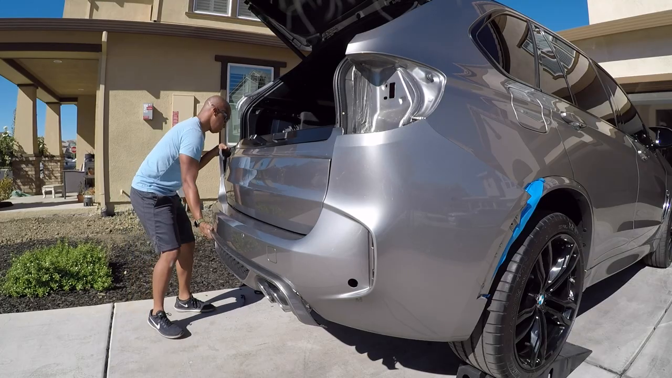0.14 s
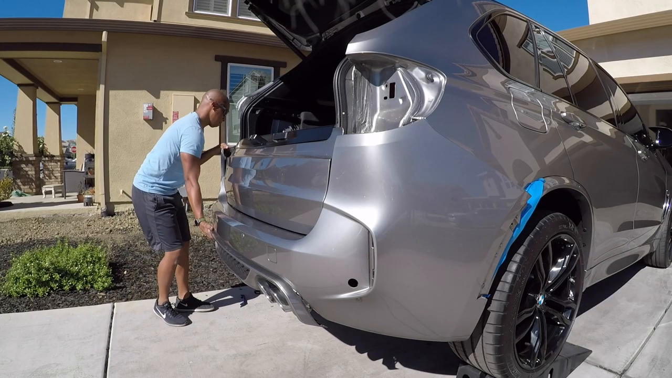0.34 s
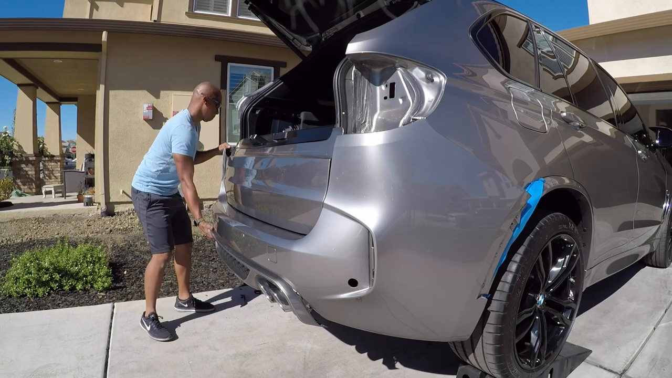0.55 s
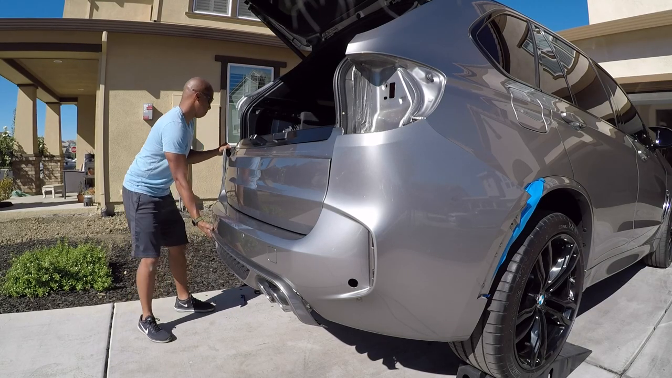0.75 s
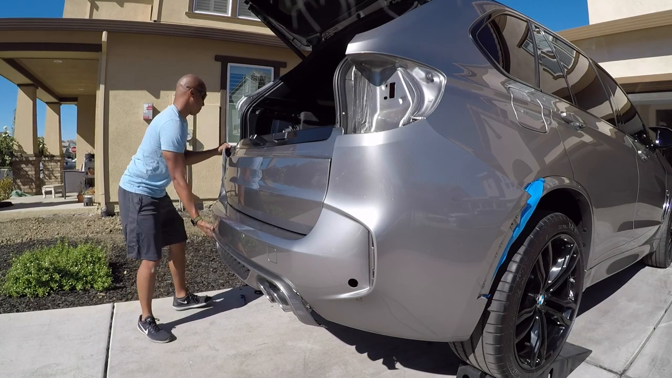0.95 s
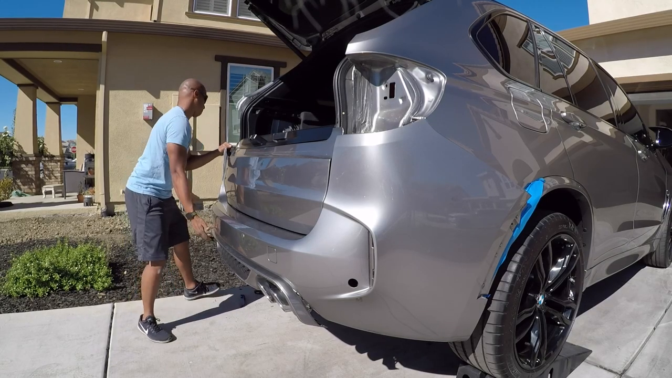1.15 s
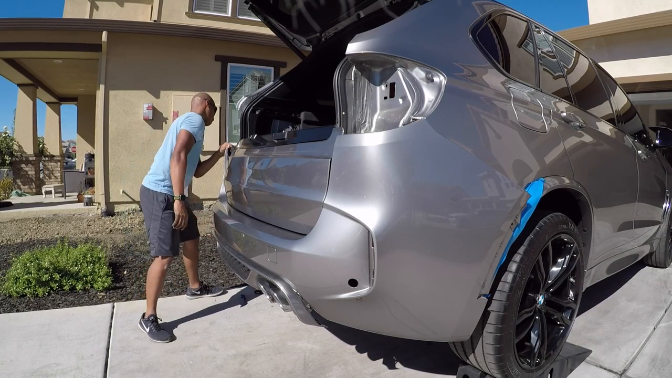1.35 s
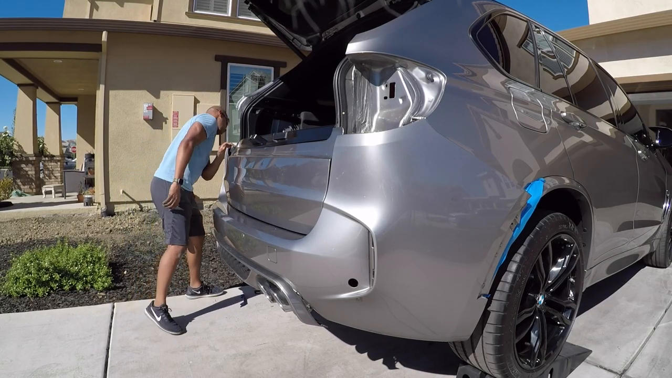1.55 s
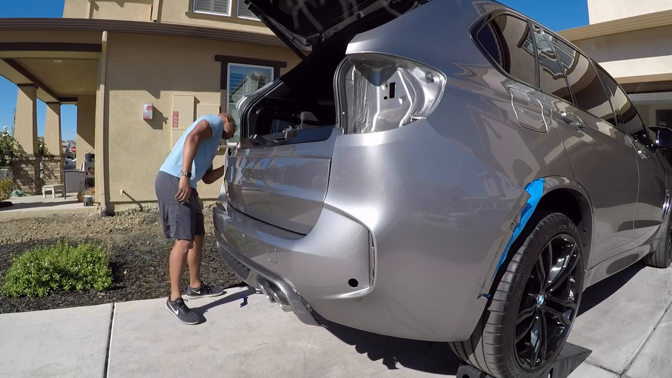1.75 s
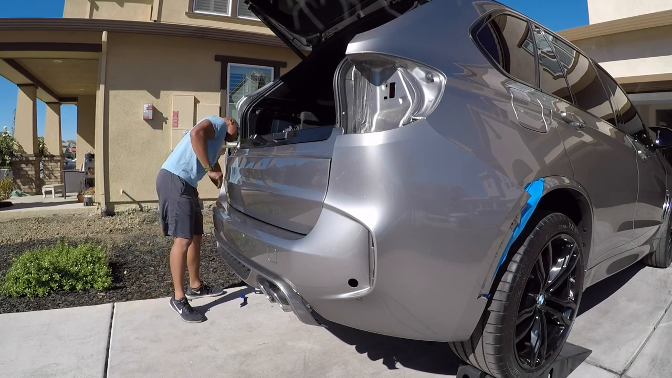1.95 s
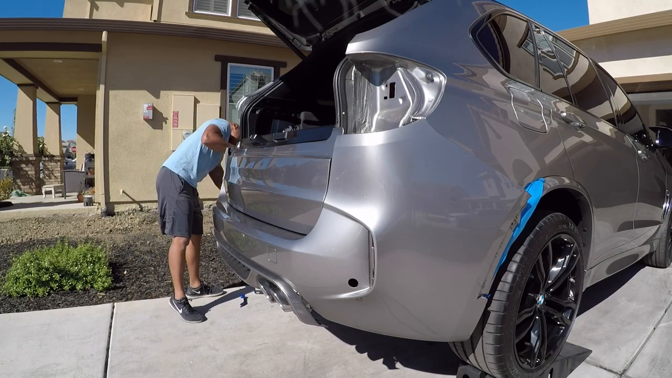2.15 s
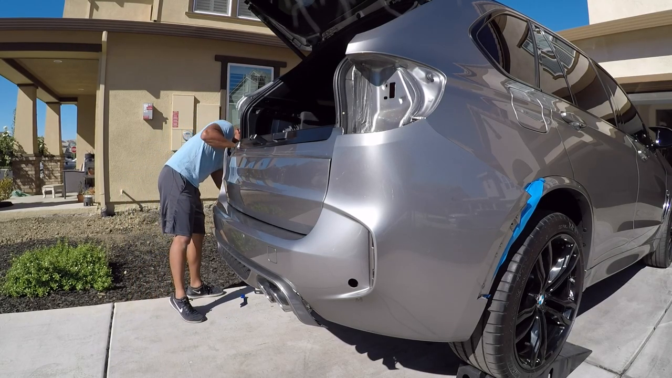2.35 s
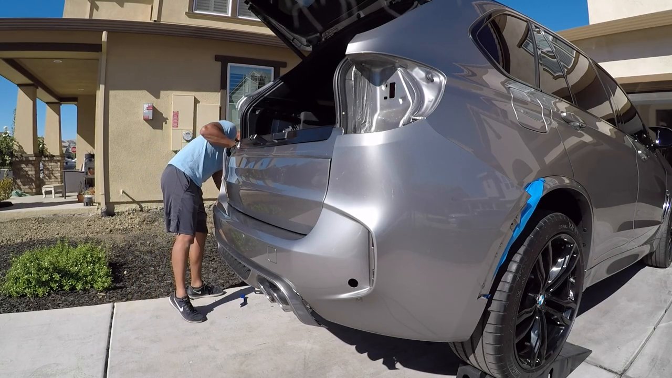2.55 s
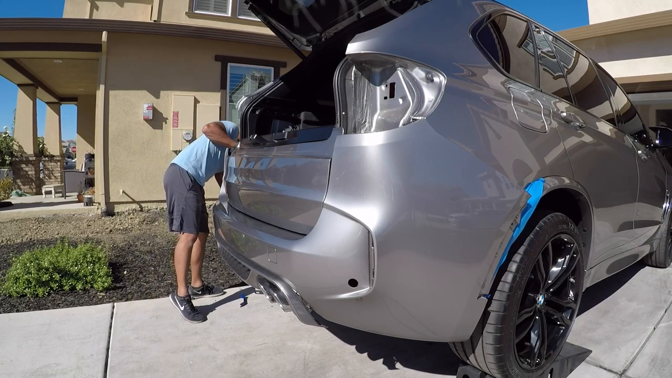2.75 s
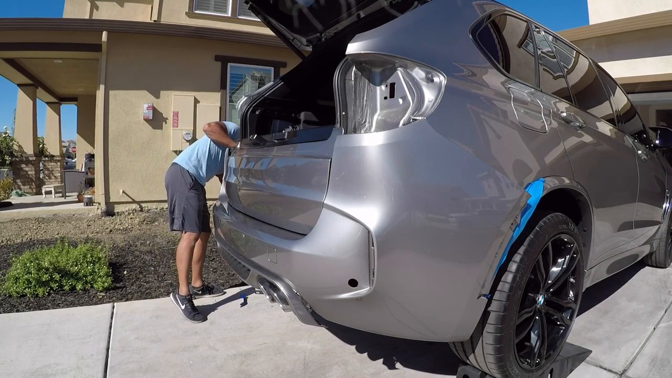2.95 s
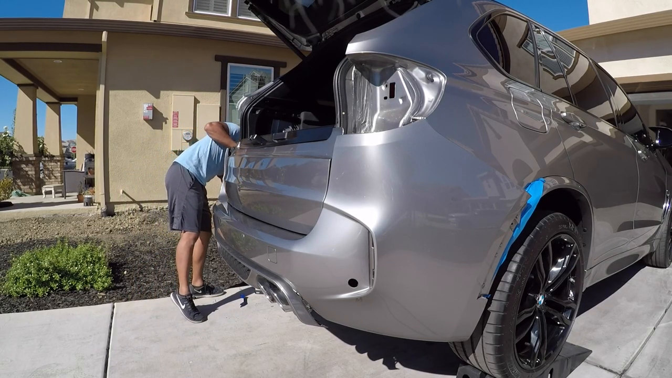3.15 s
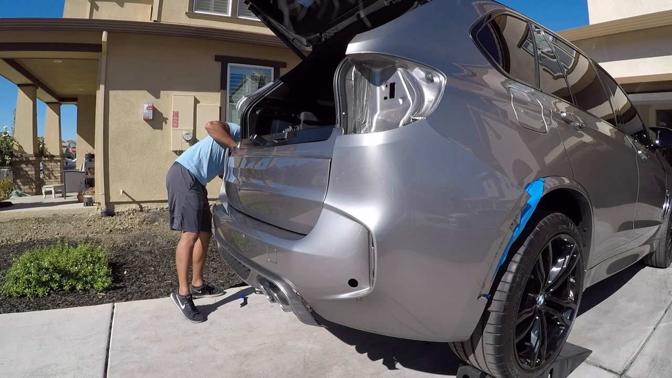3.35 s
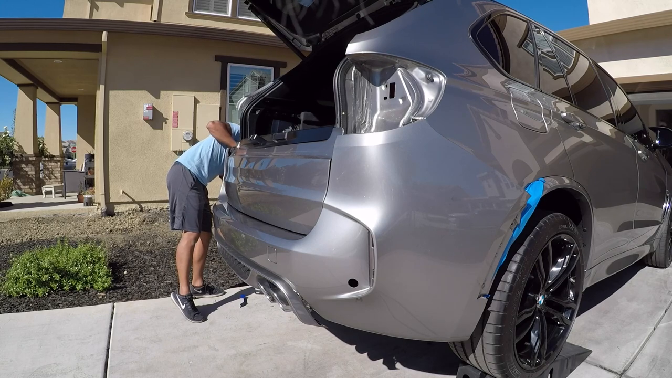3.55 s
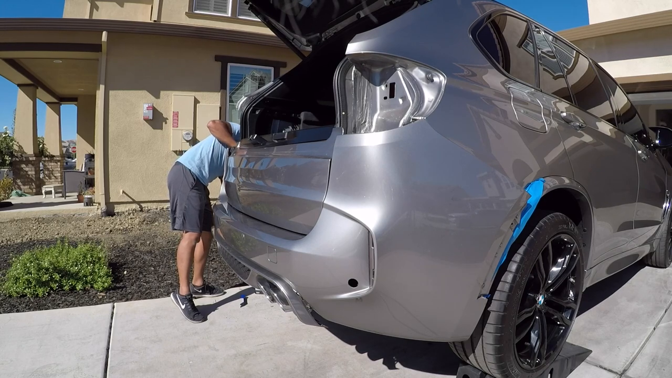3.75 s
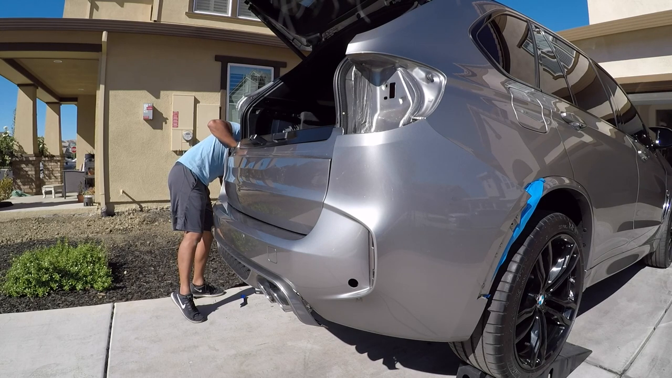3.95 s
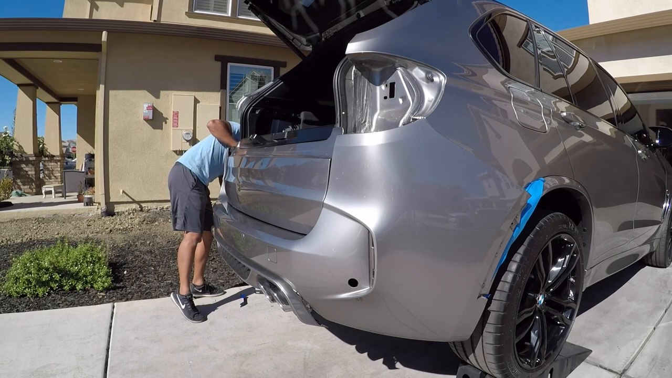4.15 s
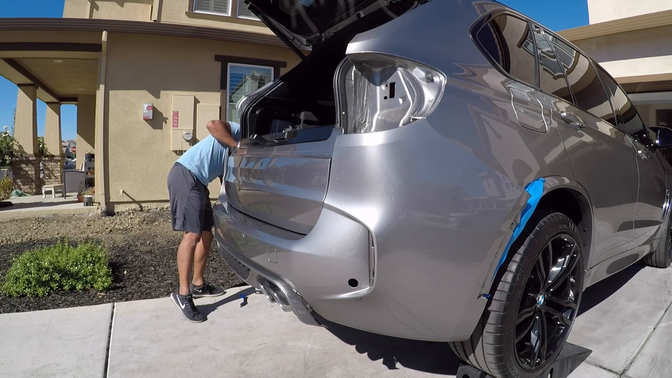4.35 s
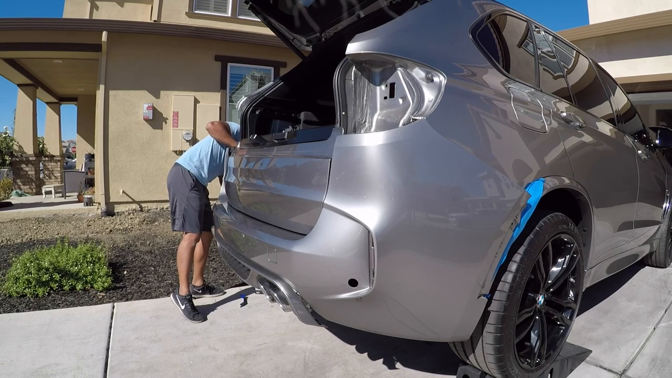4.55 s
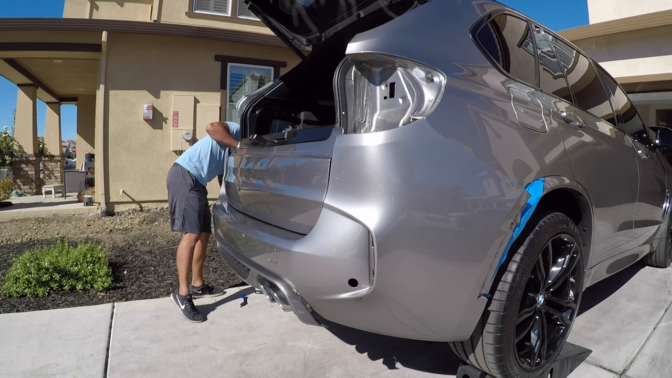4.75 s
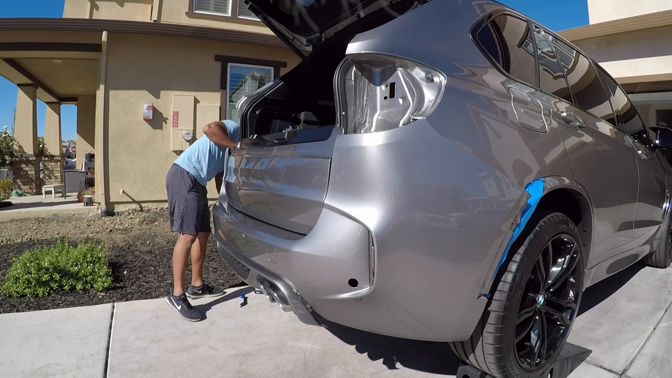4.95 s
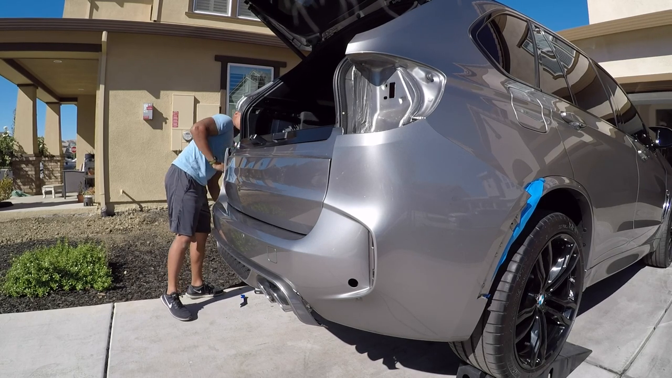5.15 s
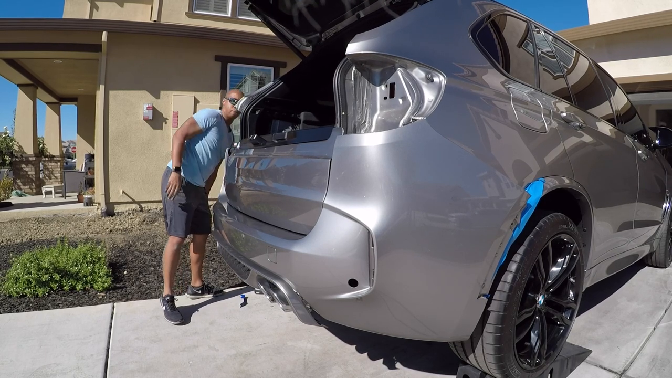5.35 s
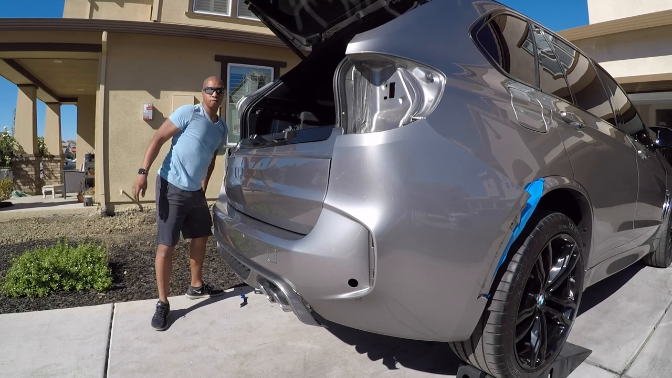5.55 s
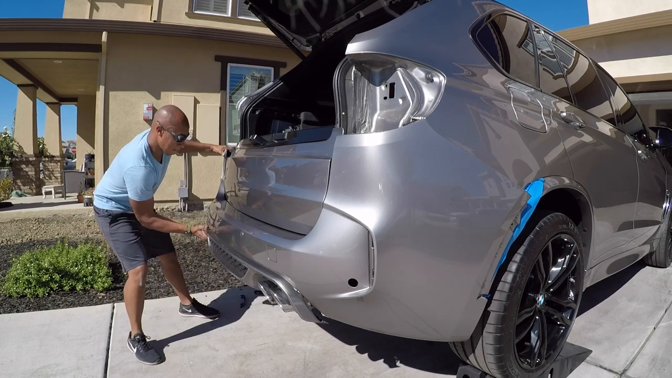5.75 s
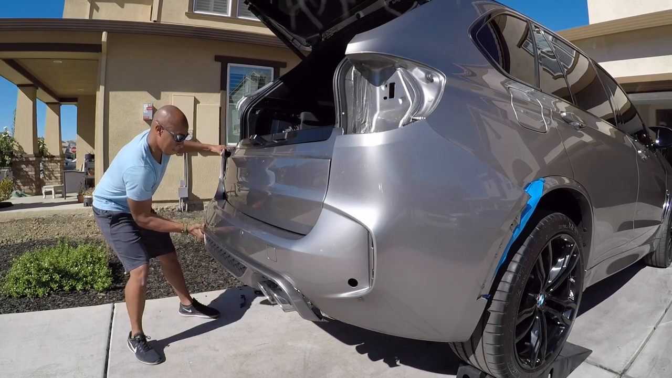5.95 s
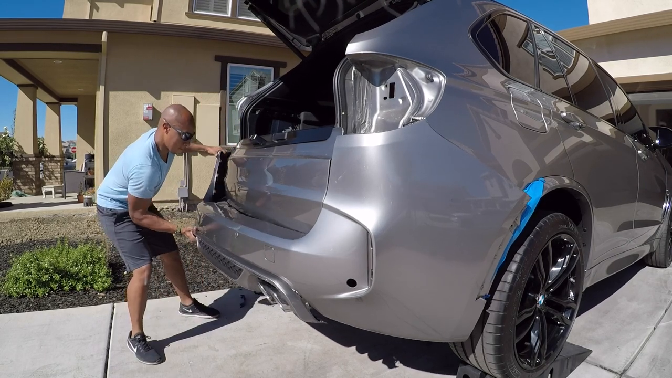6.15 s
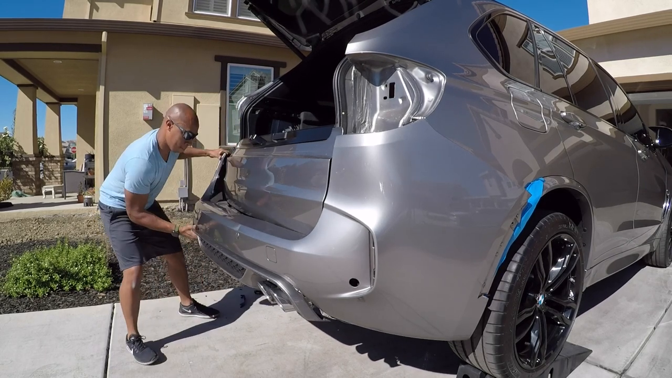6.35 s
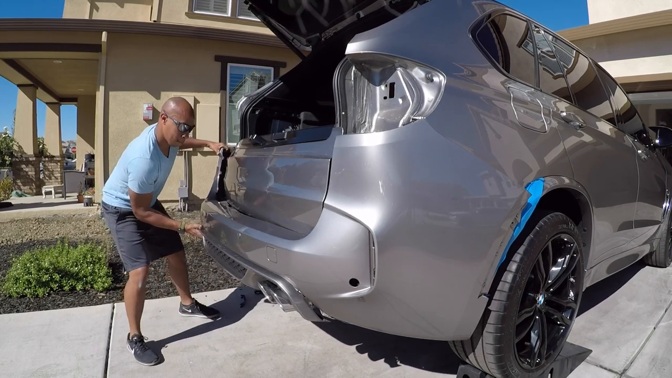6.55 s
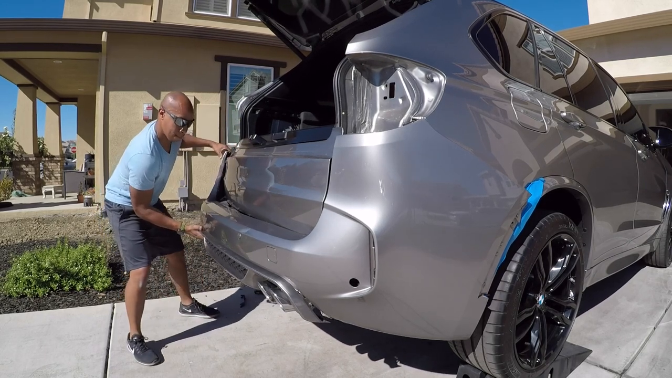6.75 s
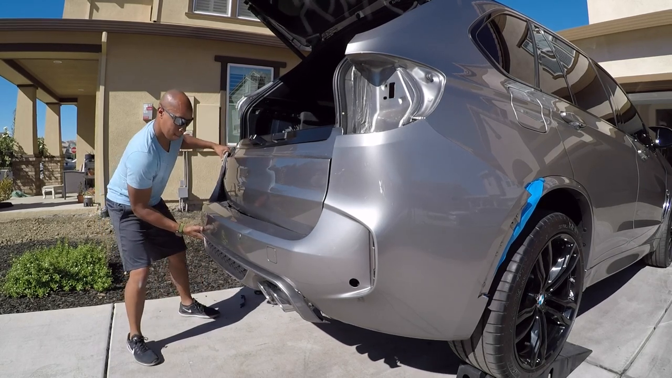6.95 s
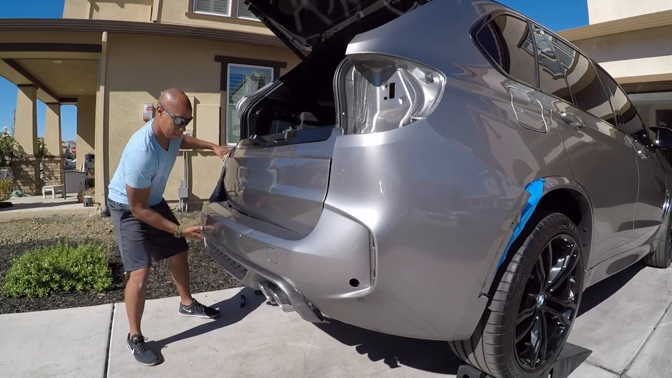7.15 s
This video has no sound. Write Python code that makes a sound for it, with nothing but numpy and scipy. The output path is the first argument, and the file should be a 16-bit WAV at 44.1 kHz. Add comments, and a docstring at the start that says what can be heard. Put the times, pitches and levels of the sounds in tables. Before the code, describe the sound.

A soft rush of distant traffic and leaves runs throughout, with a faint far hum and deep, gentle gusts on the microphone. In the first two seconds, shoes and hands scuff lightly and a car's plastic bumper cover gives a few quiet, hollow knocks. Small clip ticks and slightly firmer knocks come in clusters around 2.3 and 3.2 seconds. A faint plastic squeak follows at 3.5 seconds, then soft sliding and more light knocks near 4.6 seconds. From about 5.7 seconds the panel bends with dull thumps. Just after 6 seconds it tears free with a sharp double crack and a hollow thump, by far the loudest moment, echoing faintly off the houses. The loose shell then wobbles, with knocks and ticks that grow weaker until about 7.2 seconds.

```python
"""Pulling off a plastic bumper cover

A car's rear bumper cover is worked loose by hand on a driveway. Its clips tick, the shell knocks,
shoes scuff and an edge squeaks. The panel bends with dull thumps, then tears free with a double
crack and wobbles. Each tick, knock and crack is the ringing shell, filtered around its own pitch.
Houses throw the sound back, and a breeze buffets the microphone over a quiet neighbourhood."""
import sys
import numpy as np
from scipy import signal
from scipy.fft import rfft, irfft
from scipy.io import wavfile

SR = 44100
rng = np.random.default_rng(int(sys.argv[2]) if len(sys.argv) > 2 else 0)


def file_out(sig):
    """Save sig as 16-bit WAV at sys.argv[1]."""
    # one column per channel
    cols = np.atleast_2d(sig).T
    # limit, then scale
    lim = np.clip(cols, -1, 1)
    pcm = np.round(lim * 32767).astype(np.int16)
    wavfile.write(sys.argv[1], SR, pcm)


N = 317851
TIME = np.arange(N) / SR


def from_db(db):
    """Turn decibels into a number to multiply by."""
    return 10 ** (np.asarray(db) / 20)


def rms_one(x):
    """Scale a signal so that its average strength (rms) is 1."""
    return x / np.sqrt(np.mean(x ** 2) + 1e-20)


def at_hz(points, hz):
    """Read a value between a table's rows, with octaves evenly spaced."""
    frequencies, values = np.transpose(points)
    return np.interp(np.log(hz), np.log(frequencies), values)


def fade(t, ring_s):
    """A fade that falls by 60 dB in the ring time."""
    return np.exp(-np.log(1000) * t / ring_s)


def add(out, start_s, sound):
    """Mix a sound in at its start time."""
    at = int(start_s * SR)
    out[at:at + len(sound)] += sound[:N - at]


def cut(x, hz, kind, order=2):
    """Filter a sound: "low" keeps what is below hz, "high" what is above."""
    return signal.sosfilt(signal.butter(order, min(hz, SR * .45), kind, fs=SR, output="sos"), x)


def resonance(x, hz, width_hz):
    """Keep a narrow, ringing band around one pitch."""
    r = np.exp(-np.pi * width_hz / SR)
    feedback = [1, -2 * r * np.cos(2 * np.pi * hz / SR), r * r]
    return signal.lfilter(np.array([1, 0, -1]) * (1 - r * r) / 2, feedback, x)


def waver(hz, shape=N):
    """A random wobble, mostly slower than hz."""
    return rms_one(cut(rng.standard_normal(shape), hz, "low"))


def noise(colour):
    """Steady noise with the given balance of bass and treble."""
    hz = np.arange(N // 2 + 1) * SR / N + 1e-9
    return rms_one(irfft(rfft(rng.standard_normal(N)) * from_db(at_hz(colour, hz)), N))


def noise_bands(shape):
    """Give half-octave bands of noise, each with its centre in Hz."""
    edges_hz = 45 * 2 ** (np.arange(18) / 2)
    white = rng.standard_normal((2, *shape))  # neighbouring bands use different noise
    for k, (low, high) in enumerate(zip(edges_hz, edges_hz[1:])):
        band_filter = signal.butter(2, [low, high], "band", fs=SR, output="sos")
        yield np.sqrt(low * high), signal.sosfilt(band_filter, white[k % 2])


def traffic_and_leaves(boost_db=4.5):
    """Distant traffic and leaves blend into a soft rush."""
    # Each row: time in seconds, level in dB before the boost.
    levels = [(0, -57.5), (3, -58), (5.3, -58), (7.2, -55.5)]
    # Each row: frequency in Hz, relative level in dB.
    colour = [(50, 5), (110, 2.5), (220, -9), (400, -9), (650, -12), (950, -14), (1500, -19), (2500, -27.5),
              (5000, -33), (12000, -37), (15000, -40.5)]
    return from_db(boost_db + np.interp(TIME, *np.transpose(levels))) * noise(colour)


def machine_hum(hz=214.7, db=-62.5):
    """A far machine hums on one note that wavers in strength."""
    return from_db(db) * waver(5.9) * np.sin(2 * np.pi * hz * TIME)


def breeze(calm_db=-39.5, boost_db=0.5):
    """Smooth gusts push on the microphone and make a very deep rumble."""
    # Each row: time of the peak in seconds, level in dB before the boost, half length in seconds.
    gusts = [(1.85, -27.5, 0.42), (2.7, -36.5, 0.23), (4.2, -26, 0.48), (4.9, -31, 0.18), (5.8, -29, 0.38),
             (6.6, -22.5, 0.49)]
    # Each row: frequency in Hz, relative level of the rumble in dB.
    colour = [(1, -35), (4, 6), (8, 4), (14, -20), (25, -19), (45, -35.5), (100, -42.5), (250, -92)]
    swells = sum(from_db(db) * np.exp(-((TIME - s) / half_s) ** 2) for s, db, half_s in gusts)
    return from_db(boost_db) * (from_db(calm_db) + swells) * noise(colour)


def house_echoes(x, near_db=-27, near_ring_s=0.53, far_db=-39.0, far_delay_s=0.31, far_spread_s=0.11):
    """Sound dies away along the near house; those across the street send back a blurred echo."""
    # Each row: frequency in Hz, relative level of the echo in dB.
    colour = [(80, -4.5), (300, -5), (1000, -5.5), (3000, -6.5), (7000, -12.5), (10000, -16), (15000, -38)]
    t = np.arange(SR) / SR
    near = fade(t, near_ring_s)
    far = np.exp(-((t - far_delay_s) / far_spread_s) ** 2)
    envelope = np.hypot(from_db(near_db) * near / np.linalg.norm(near),
                        from_db(far_db) * far / np.linalg.norm(far))
    return signal.fftconvolve(x, noise(colour)[:SR] * envelope)[:N]


def scuffs(grain_db=2.0, dull_hz=3000):
    """Soles, hands and the panel slide, making gritty noise that swells and fades."""
    # Each row: time of the peak in seconds, level in dB, half length in seconds, low and high edge in Hz.
    slides = [(0.174, -54, 0.21, 102, 162), (0.202, -50, 0.036, 1100, 6960), (0.2, -62, 0.033, 1320, 2620),
              (0.345, -63.5, 0.018, 1700, 6460), (0.515, -65.5, 0.035, 1300, 7000),
              (0.762, -65, 0.035, 1720, 7000), (1.16, -67, 0.46, 806, 1020),
              (1.457, -55.5, 0.072, 830, 1100), (1.496, -69.5, 0.062, 3000, 7000),
              (3.486, -67.5, 0.22, 1300, 3350), (4.168, -57.5, 0.11, 258, 2120),
              (4.488, -68.5, 0.19, 1100, 5970)]
    grit = rng.standard_normal(N) * from_db(grain_db * waver(400))
    grit = cut(grit, dull_hz, "low", order=1)
    out = np.zeros(N)
    for s, db, half_s, low_hz, high_hz in slides:
        swell = np.exp(1 - np.hypot(1, 2 * (TIME - s) / half_s))
        band = cut(cut(grit, low_hz, "high", order=4), high_hz, "low", order=4)
        out += from_db(db) * swell * rms_one(band)
    return out


def squeak(start_s=3.51, db=-53.5, hz=1650, rise_hz_per_s=480, roughness=0.022, second_db=-5):
    """Plastic sticks and slips on plastic at two spots: a faint squeal that rises as it dies."""
    t, out = np.arange(SR // 4) / SR, np.zeros(N)
    pitch = (hz + rise_hz_per_s * t) * (1 + roughness * waver(146, (2, len(t))))
    first, second = np.sin(2 * np.pi * np.cumsum(pitch, axis=1) / SR)
    envelope = (1 - np.exp(-t / 0.011)) * fade(t, ring_s=.36)  # quick rise, slower fall
    add(out, start_s, from_db(db) * envelope * (first + from_db(second_db) * second))
    return out


def panel_thumps(rise_s=0.002):
    """The broad panel gives under the hands with soft, hollow thumps."""
    # Each row: start in seconds, level in dB.
    pushes = [(5.743, -28.5), (5.871, -34.5), (5.893, -24.5), (5.97, -39), (6.050, -3.5)]
    # The panel's two dull notes. Each row: pitch in Hz, relative level in dB, ring time in seconds.
    notes = [(238, 0.0057, 0.1), (408, 0.028, 0.042)]
    t, out = np.arange(SR // 4) / SR, np.zeros(N)
    thump = sum(from_db(db) * np.sin(2 * np.pi * hz * t) * fade(t, ring_s) for hz, db, ring_s in notes)
    thump *= 1 - np.exp(-t / rise_s)
    for start_s, db in pushes:
        add(out, start_s, from_db(db) * thump)
    return out


def shell_rings(ring_factors, notes_db=-24.5, click_db=6, build_s=0.0015):
    """The shell answers each hit with a click, a wash of countless close notes and some clear ones."""
    # The wash. Each row: frequency in Hz, relative level in dB.
    wash_colour = [(60, 19.5), (150, 13.5), (400, 6.5), (900, 2), (1800, -1), (3500, -7), (7000, -12.5),
                   (11000, -9.5), (15000, -14)]
    # Each row: frequency in Hz, the wash's ring time in seconds before the ring factor.
    wash_times = [(60, 0.43), (250, 0.2), (700, 0.14), (2000, .11), (6000, 0.1), (15000, 0.041)]
    # Each row: pitch in Hz, relative level in dB, ring time in seconds before the ring factor.
    clear_notes = [(93, 3.5, .4), (135, -1.5, 0.36), (167, 3.5, 0.48), (202, -5.5, 0.36),
                   (251.3, 5.5, 0.36), (240, -5.5, .18), (304.5, -2.5, 0.57), (353, -2, 0.12),
                   (451.6, 3, 0.2), (531, -4.5, 0.23), (611, -2, 0.19), (671, 0.5, 0.23), (778.5, -3, 0.35),
                   (922, -1.5, 0.13), (1150, 4.5, 0.12), (1408, -6.5, 0.12), (1434, -4.5, 0.15),
                   (1568, -2, 0.11), (1940, -7.5, 0.11), (2336, -8.5, 0.096), (2470, -7.5, 0.18),
                   (3200, -4, 0.099), (3685, -5.5, 0.066)]
    t, shape = np.arange(SR // 3) / SR, ring_factors.shape
    out = np.zeros((len(ring_factors), len(t)))
    for hz, band in noise_bands(out.shape):
        # Low bending waves travel slowly, so the bass builds up after the treble.
        build = 1 - np.exp(-t / (build_s * np.sqrt(1000 / hz)))
        envelope = build * fade(t, ring_factors * at_hz(wash_times, hz))
        out += from_db(at_hz(wash_colour, hz)) * envelope * band
    for hz, db, ring_s in clear_notes:
        # Each spot that is hit starts a note with its own strength and sign.
        strength = from_db(notes_db + db + rng.normal(0, 2.3, shape)) * rng.choice([-1, 1], shape)
        out += strength * np.sin(2 * np.pi * hz * t) * fade(t, ring_factors * ring_s)
    out[:, 0] += from_db(click_db)
    return out


def contact(ring, pitch_hz, spread, rattle_db=-26, rattle_top_hz=9000):
    """Small clips make no bass and soft contacts little treble; hard edges add a faint rattle."""
    low_hz, high_hz = pitch_hz / spread, pitch_hz * spread
    ring = cut(ring, low_hz, "high")
    rattle = cut(cut(ring, high_hz, "high"), rattle_top_hz, "low")
    return cut(ring, high_hz, "low") - from_db(rattle_db) * rattle


def strike(hits, spread, release_s=6.03):
    """Play hits on the cover, which sounds hollow until it comes off the car."""
    # The hollow rings. Each row: pitch in Hz, width in Hz, relative level in dB.
    hollows = [(462.4, 38, 3), (1090, 40, -8), (1680, 160, 0)]
    rings = shell_rings(np.array(hits)[:, 3:])  # a ring factor of 2 rings twice as long
    out = np.zeros(N)
    for (start_s, db, pitch_hz, _), ring in zip(hits, rings):
        sound = contact(ring, pitch_hz, spread)
        if start_s < release_s:
            sound += sum(from_db(gain_db) * resonance(sound, hz, width) for hz, width, gain_db in hollows)
        add(out, start_s, from_db(db) * sound / np.std(sound[:SR // 50]))  # level of the first 20 ms
    return out


def clip_ticks():
    """The small clips that hold the cover tick in their slots."""
    # Each row: start in seconds, level in dB, pitch in Hz, ring factor.
    hits = [(.378, -64, 5170, .9), (1.352, -67.5, 3400, 0.62), (1.75, -64.5, 3850, 1.1),
            (2.304, -55, 3470, 1.9), (2.374, -48.5, 5060, 1.04), (2.76, -61, 2400, 2.2),
            (3.135, -61, 3700, 4), (3.183, -50, 3260, 1.3), (3.223, -55.5, 3420, 2.7),
            (3.324, -64, 2180, 0.27), (3.408, -61.5, 5770, 1.5), (3.484, -59.5, 3350, 0.54),
            (3.869, -67, 3500, 0.51), (4.37, -64.5, 3840, 0.44), (4.52, -62, 4000, 0.91),
            (4.596, -55, 1980, 0.65), (5.514, -66.5, 4400, .8), (5.612, -67, 4000, 0.87),
            (5.848, -53.5, 3100, 0.87), (5.884, -56, 1500, 3.9), (6.107, -31.5, 6380, 1.54),
            (6.447, -56.5, 4750, 2), (6.55, -61, 6300, 0.64), (6.568, -44, 3700, 0.55),
            (6.648, -55, 3000, 1.1)]
    return strike(hits, spread=1.9)


def shell_knocks():
    """The plastic shell knocks against the car's body."""
    # Each row: start in seconds, level in dB, pitch in Hz, ring factor.
    hits = [(.481, -51, 730, 1.9), (.715, -43, 856, 1.5), (1.354, -48.5, 630, 1.2),
            (1.457, -48.5, 430, 1.2), (1.522, -48, 523, 0.66), (1.557, -55, 320, 0.76),
            (1.609, -52.5, 370, 0.77), (2.261, -38.5, 960, 1.15), (2.334, -54.5, 1400, 0.84),
            (2.38, -49, 520, 0.69), (2.44, -53, 1000, 0.35), (2.546, -59, 1090, 0.12),
            (2.843, -61.5, 925, 0.099), (3.19, -37, 870, 0.54), (3.201, -41.5, 564, 0.75),
            (3.254, -49.5, 165, .6), (4.544, -48, 570, 1.7), (4.595, -43, 434, 0.74),
            (4.617, -46, 243, 0.67), (6.099, -18.5, 310, 1.1), (6.107, -22.5, 1150, 1.17),
            (6.138, -26.5, 963, 0.64), (6.287, -30, 635, 1.1), (6.337, -36, 506, 0.91),
            (6.456, -28.5, 670, 1.32), (6.477, -43.5, 270, 1.9), (6.648, -42.5, 720, 1.04),
            (6.856, -43.5, 594, 1.3), (6.921, -45.5, 658, 1), (6.998, -42.5, 698, 1.07),
            (7.179, -55.5, 642, 1.85)]
    return strike(hits, spread=1.95)


def cracks(snap_pitch_ratio=2.38):
    """Each catch tears briefly, then lets go with a bright snap and a boom as the shell springs out."""
    # Each row: start in seconds, level in dB, tearing time in seconds, the tear's pitch in Hz,
    # its ring factor, snap and boom levels in dB relative to the tear, boom pitch in Hz.
    catches = [(6.041, -14, .011, 1290, 1.96, -10.5, 5.5, 800), (6.079, -12, .005, 1714, 0.99, -1, 0, 371)]
    tears, snaps, booms = [], [], []
    for start_s, db, tear_s, hz, ring_factor, snap_db, boom_db, boom_hz in catches:
        tears.append((start_s, db, hz, ring_factor))
        snaps.append((start_s + tear_s, db + snap_db, hz * snap_pitch_ratio, 1.0))
        booms.append((start_s + tear_s, db + boom_db, boom_hz, .55))
    return strike(tears, spread=2.8) + strike(snaps, spread=2.16) + strike(booms, spread=3.0)


def scene():
    """Mix the work on the bumper, its echoes and the street into one channel."""
    work = cracks() + shell_knocks() + clip_ticks() + panel_thumps() + scuffs() + squeak()
    return (work + house_echoes(work) + machine_hum() + traffic_and_leaves() + breeze())[None]


def record(dry, top_hz=16400, ceiling=.8):
    """Round off the loudest peaks, cutting the highest treble before and after."""
    treble_cut = signal.cheby2(14, 70, top_hz, fs=SR, output="sos")
    heard = signal.sosfilt(treble_cut, dry)
    rounded = heard / (1 + (heard / ceiling) ** 4) ** .25
    return signal.sosfilt(treble_cut, rounded)


dry = scene()
out = record(dry)
file_out(out)
```